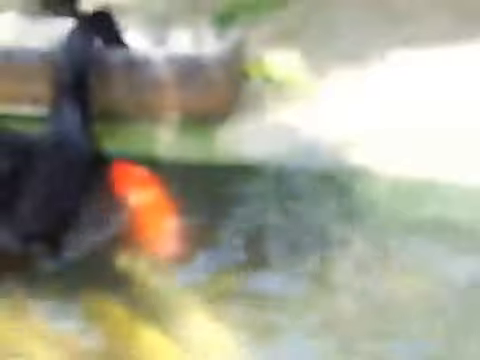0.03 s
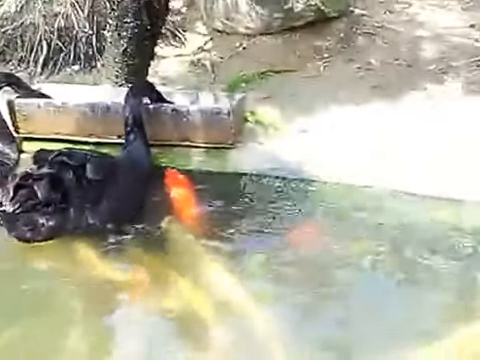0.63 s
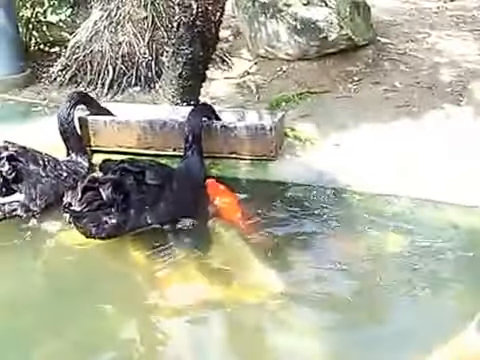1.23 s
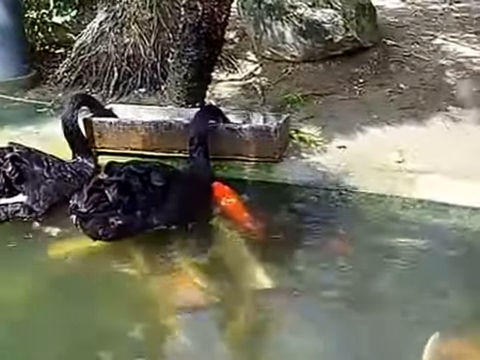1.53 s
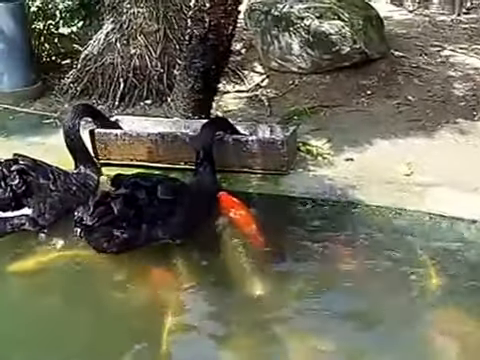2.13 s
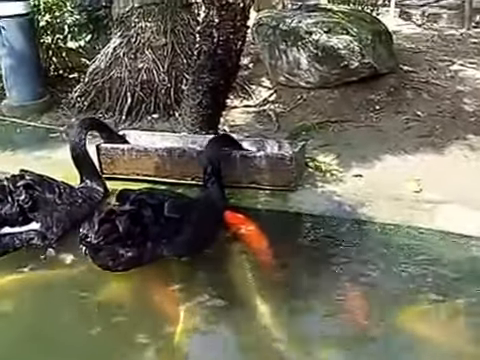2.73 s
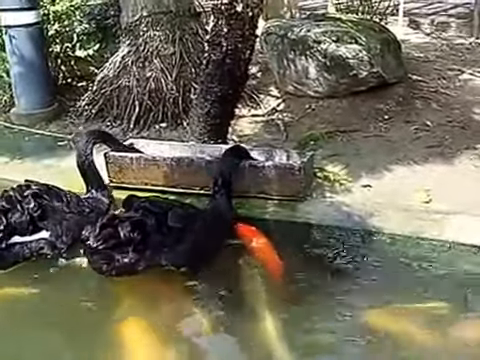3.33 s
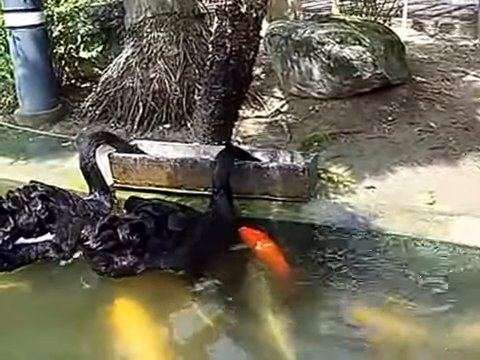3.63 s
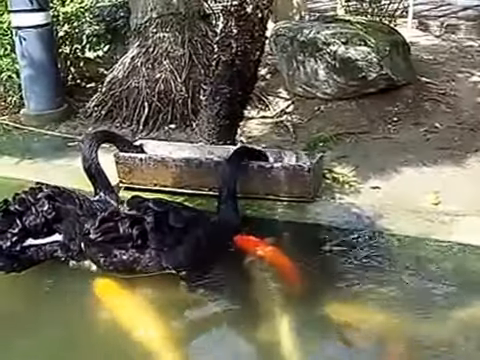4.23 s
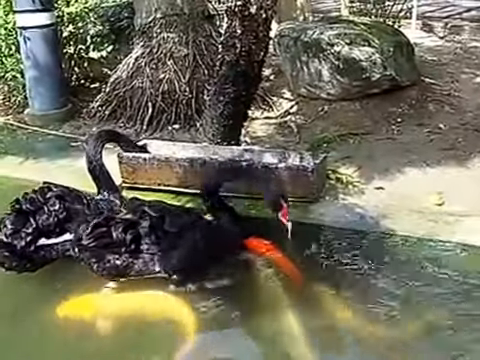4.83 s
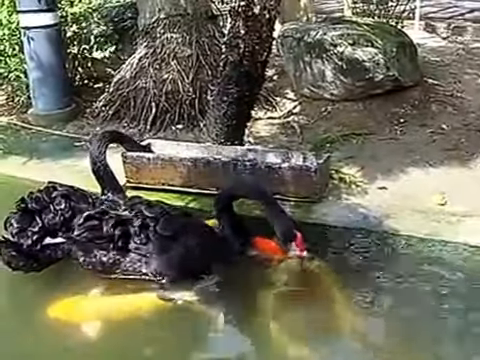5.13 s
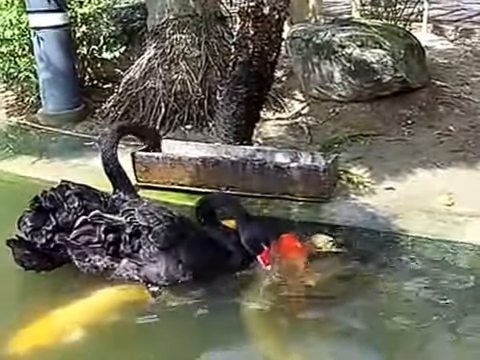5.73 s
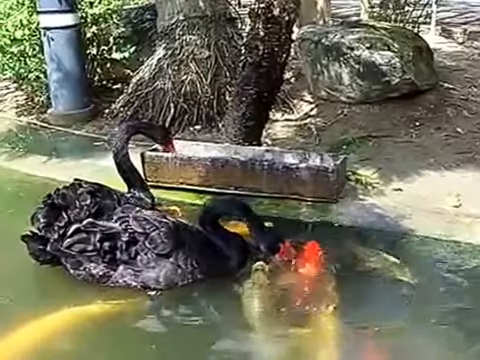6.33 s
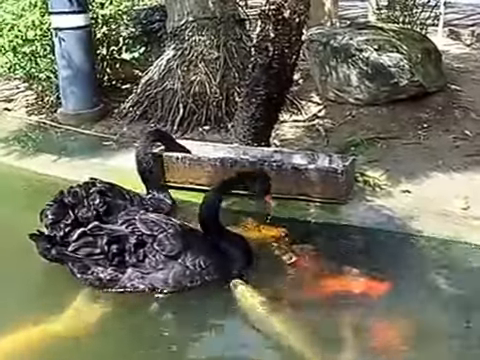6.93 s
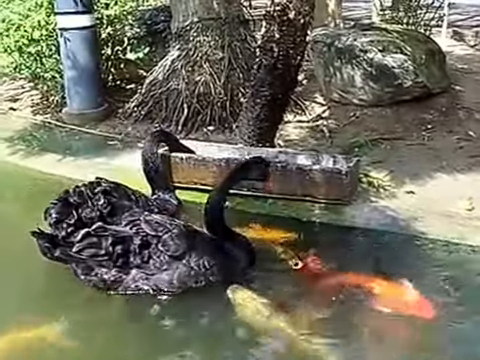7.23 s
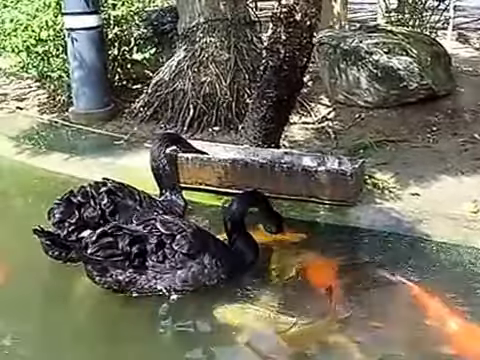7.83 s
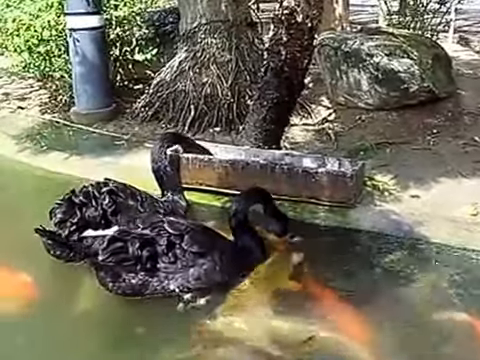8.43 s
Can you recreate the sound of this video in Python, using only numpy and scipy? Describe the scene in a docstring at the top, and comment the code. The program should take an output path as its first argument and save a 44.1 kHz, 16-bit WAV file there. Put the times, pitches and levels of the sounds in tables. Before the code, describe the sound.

Quick hollow pecks of feeding swans, with small plops, faint fish slurps and low wind gusts, after a short camera zoom buzz.

```python
"""A small camera's lens motor buzzes for a second as it zooms out, over quick runs of hollow knocks:
black swans feeding, bills striking a pond-side trough. Water ticks, plops and fizzes as bubbles ring
and burst, carp slurp at the surface, and a swan dips in with a splash. Birds call from far trees,
and gusts thump on the microphone, heaviest in the second half."""
import sys
import numpy as np
from scipy import signal
from scipy.fft import rfft, irfft
from scipy.io import wavfile
from scipy.ndimage import uniform_filter1d

SR = 44100
rng = np.random.default_rng(int(sys.argv[2]) if len(sys.argv) > 2 else 0)


def dump_mix(stems):
    """Bounce the given channels to the path in sys.argv[1] as a 16-bit WAV at rate SR."""
    frames = np.atleast_2d(stems).T  # one column per channel
    limited = np.clip(frames, -1, 1)  # hard clip at full scale
    pcm = np.round(limited * 32767).astype(np.int16)
    wavfile.write(sys.argv[1], SR, pcm)


N = 374761
T = np.arange(N) / SR


# Runs of bill strokes: first t/s, last t/s, first level/dB, last level/dB, closing tap re stroke/dB
BILL_RUNS = [(0.051, 0.365, -40.5, -31.5, -12), (0.437, 0.736, -31, -35.5, -14),
             (0.958, 0.958, -39, -39, -12), (1.107, 1.409, -38, -40, -12), (1.566, 1.642, -42, -41, -12),
             (1.8, 2.108, -37.5, -42, -11), (2.181, 2.258, -35.5, -35.5, -13),
             (2.335, 2.476, -40, -33, -11), (2.7, 2.778, -41, -44, -12), (2.85, 3.0, -32.5, -33, -8),
             (3.08, 3.24, -36, -36.5, -4), (3.319, 3.481, -38, -43, -12), (3.641, 3.88, -41.5, -43, -12),
             (4.189, 4.541, -39, -36, -14), (4.612, 4.831, -34.5, -35, -15),
             (4.981, 5.058, -34, -35.5, -15), (5.131, 5.281, -39, -33.5, -12),
             (5.359, 5.511, -36, -41, -12), (6.808, 7.175, -36.5, -35, -12), (7.474, 7.682, -35, -41, -13),
             (8.351, 8.438, -40.5, -44, -12)]
def strokes():
    """The feeding rhythm: a run keeps its pace while its force grows or fades, and ends on an accent."""
    pace_s, final_accent_db, scatter_db = 0.075, 2.5, 1.5
    for first, last, first_db, last_db, closing_db in BILL_RUNS:
        for u in np.linspace(0, 1, round((last - first) / pace_s) + 1):
            accent_db = final_accent_db * (u == 1) + scatter_db * rng.standard_normal()
            yield first + u * (last - first), first_db + u * (last_db - first_db) + accent_db, closing_db


# The trough's hollow body, one mode a row: f/Hz, t60/s, relative level/dB
TROUGH_MODES = [(252, 0.034, -19), (379, 0.045, -14), (555, 0.021, -4.5), (584, 0.018, 0.5),
                (682, 0.018, -9.5), (1195, 0.0075, 5.5), (1410, 0.007, -22), (2300, 0.0085, -5.5)]
def pecks():
    """Each stroke snaps and knocks the trough at a new place, and the bill closes softly just after."""
    hz, t60, db = np.transpose(TROUGH_MODES)[:, :, None]
    out, t = np.zeros(N), span(0.05)
    attack = 1 - np.exp(-t / 0.00029)
    for at, level_db, closing_db in strokes():
        place, size = rng.standard_normal((2, *hz.shape))
        bright_db = 0.082 * (level_db + 26) - 9  # harder strokes are brighter
        gain = amp(db + 2.5 * size + (hz > 1000) * bright_db)
        body = (gain * ring(t, hz * (1 + 0.038 * place), t60)).sum(axis=0)
        snap = band(rng.standard_normal(len(t)), 1600, 1300) * np.exp(-t / 0.0025)
        knock = body * attack + amp(bright_db) * snap
        knock *= amp(level_db + 4) / np.abs(knock).max()
        add(out, at + 0.00055, knock)
        closing_at = at + rng.uniform(0.008, 0.023)
        add(out, closing_at, amp(closing_db + 0.83 * rng.standard_normal()) * knock)
    return high_pass(out, hz=192)


# The lens barrel's ring, one mode a row: f/Hz, t60/s, relative level/dB
BARREL_MODES = [(1070, 0.13, -33.5), (1470, 0.0099, -16.5), (1980, 0.0086, -14), (2100, 0.007, -12.5),
                (2420, 0.0076, -13), (2960, 0.004, -12.5), (3400, 0.032, -35.5), (3730, 0.036, -26),
                (4950, 0.0093, -11.5), (5220, 0.013, -15), (6840, 0.0046, -12), (7270, 0.0072, 1),
                (6990, 0.003, -8)]
def zoom_motor():
    """A stepper motor clicks the lens barrel; every third step lands hard and late, the last ones slow."""
    steps, fast_steps = 133, 121
    step_s, slow_step_s, late_s = 0.007852, 0.00932, 0.0005
    softness_db = [0, 9, 14]  # cycles with the steps
    hz, t60, db = np.transpose(BARREL_MODES)[:, :, None]
    out, t, drift = np.zeros(N), span(0.03), walk(5)
    push = 1 - np.exp(-t / 0.0005)  # the rotor needs a moment to load the barrel
    treble = np.clip((hz - 2300) / 4500, 0, 1)
    for k, (force, edge, slip) in enumerate(rng.standard_normal((steps, 3))):
        slowing = max(k - fast_steps, 0) * (slow_step_s - step_s)
        at = 0.0004 + k * step_s + slowing + late_s * (k % 3 == 0)
        at += 1.2e-4 * drift[int(at * SR)] + 1.2e-5 * slip
        limp = 0.5 + 0.5 * np.sin(np.pi * k / steps)  # the steps are most uneven in mid travel
        dull_db = (limp * (softness_db[k % 3] - 9) + 9.5 + 0.5 * edge) * treble
        detune, size = rng.standard_normal((2, *hz.shape))
        modes = ring(t, hz + 9 * detune, t60) * amp(db - dull_db + 0.5 * size)
        scrape = amp(-6.5) * band(rng.standard_normal(len(t)) * np.exp(-t / 0.0034), 2090, 470)
        add(out, at, amp(0.37 * force) * push * (modes.sum(axis=0) + scrape))
    return amp(-20.5) * high_pass(out, hz=950)


def stray_droplets():
    """Cues for faint ticks of spray at random times, each with its own pitch."""
    per_s, level_db, centre_hz, body_db = 1.3, -44.5, 7200, -13
    chance = rng.random((round(per_s * N / SR), 2))
    return [(when * N / SR, level_db, centre_hz * 1.25 ** (pitch - 0.5), body_db)
            for when, pitch in chance]


# The sharpest ticks: t/s, relative level/dB, ring f/Hz, body trim/dB
SHARP_TICKS = [(1.336, -34.5, 7860, -23), (1.3907, -29.5, 7400, -2), (1.4061, -27.5, 6370, -13),
               (1.4238, -34, 7940, -8.5), (1.4406, -30.5, 6450, -15), (1.4875, -23, 7200, -13),
               (1.504, -38.5, 7020, 2), (1.5208, -35, 5200, -2), (1.6172, -35.5, 6300, -9.5),
               (1.7302, -35, 8000, -26), (2.0458, -35.5, 7940, -14), (3.0907, -38, 7850, -4),
               (3.2934, -35, 7630, -15), (3.629, -33, 7200, -14.5), (5.1992, -32, 7600, 5.5),
               (5.3199, -31.5, 7200, -4), (5.4047, -37.5, 6800, 4.5), (6.0079, -31.5, 7584, -5),
               (6.206, -34.5, 7060, -3.5), (6.246, -32.5, 7450, -19), (6.4672, -33.5, 5800, -21.5),
               (6.5545, -44.5, 5900, 12)]
def ticks():
    """Spray and bill tips make tiny dry snaps: a brief high ring and a crack with some body."""
    out, t = np.zeros(N), span(0.02)
    attack = 1 - np.exp(-t / 0.0005)
    decay = np.exp(-t / 0.0007) + 0.07 * np.exp(-t / 0.003)
    for at, db, hz, body_db in SHARP_TICKS + stray_droplets():
        crack = rng.standard_normal(len(t)) * attack * decay
        tip = amp(6) * unit(ring(t, hz, t60=0.0042)) + steep_band(crack, 6500, 3400)
        body = amp(body_db - 2.5) * steep_band(crack, 2300, 2600)
        add(out, at + 0.00089, amp(db - 12) * (unit(tip) + body))
    return out


# Bubbles and drips: t/s, relative level/dB, starting f/Hz
BUBBLES = [(1.5205, -39, 3030), (1.585, -42.5, 2400), (2.216, -37.5, 2650), (2.771, -45, 2840),
           (5.021, -36, 1395), (5.059, -40, 1520), (5.2058, -33, 2470), (5.5914, -35.5, 2780),
           (6.2087, -43, 1070), (6.309, -33.5, 2230), (6.4277, -37, 2070), (6.555, -34.5, 2590),
           (6.634, -35, 1250)]
def plops():
    """Small bubbles ring and rise in pitch as they reach the surface; each opens with a wet crack."""
    out, t = np.zeros(N), span(0.03)
    attack = 1 - np.exp(-t / 0.0011)
    for at, db, hz in BUBBLES:
        crack = band(rng.standard_normal(len(t)) * np.exp(-t / 0.0022), hz, 1100)
        bubble = unit(ring(t, hz, t60=0.02, rise=0.069)) + amp(-5) * unit(crack)
        add(out, at + 0.00055, amp(db - 11.5) * bubble * attack)
    return out


# Carp sucking at the surface: t/s, length/s, start f/Hz, end f/Hz, level/dB
CARP_GULPS = [(2.879, .08, 426, 950, -50), (5.468, 0.06, 759, 2300, -55.5),
              (5.843, 0.081, 455, 1776, -48.5), (5.932, 0.04, 813, 1930, -61),
              (6.196, 0.088, 950, 1560, -73), (6.515, 0.042, 543, 1650, -58)]
def slurps():
    """A pocket of air shrinks in a closing mouth, so its unsteady note sweeps upward."""
    out, flutter = np.zeros(N), walk(350)
    for at, length, from_hz, to_hz, db in CARP_GULPS:
        u = span(length) / length
        wobble = flutter[int(at * SR):][:len(u)]
        hz = from_hz * (to_hz / from_hz) ** u * (1 + 0.03 * wobble)
        phase = 2 * np.pi * np.cumsum(hz) / SR
        note = np.sin(phase) + amp(-10) * np.sin(1.6 * phase)
        envelope = np.sin(np.pi * u ** 0.75) ** 2 * (1 + 0.35 * wobble)
        add(out, at, amp(db) * unit(note * envelope))
    return out


# Splashes and soft laps: t/s, length/s, relative level/dB, spray trim/dB
SPLASH_CUES = [(1.156, 0.04, -56, -36), (1.37, 0.017, -55, -5), (1.508, 0.019, -53.5, -6),
               (5.045, 0.058, -56.5, -28), (5.18, 0.01, -50, 1), (5.197, .02, -39.5, -10.5),
               (5.31, 0.054, -45.5, -2), (6.06, 0.024, -54, -21), (6.111, 0.17, -52, -0.5),
               (6.404, 0.11, -57, 8), (6.804, .19, -62, -17)]
def splashes():
    """Broken water: a shower of little bubbles and finer spray."""
    out, t = np.zeros(N), span(0.015)
    for at, length, db, spray_db in SPLASH_CUES:
        shower = np.zeros(int(length * SR) + len(t))
        for when, pitch, size, kind in rng.random((70, 4)):
            is_spray = kind > 0.5
            hz = 5000 * 1.65 ** pitch if is_spray else 1050 * 3 ** pitch
            cycles = 16 if is_spray else 11
            grain = ring(t, hz, t60=cycles / hz) * (1 - np.exp(-2 * t * hz))
            grain_db = -3 * np.log(1 - size) + is_spray * (spray_db + 10)
            add(shower, length * when ** 1.2, grain * amp(grain_db))
        add(out, at, amp(db + max(spray_db, 0) / 2) * unit(shower))
    return out


# Fader ride for the ripples around the swans: t/s, relative level/dB
FIZZ_RIDE = [(0, -53), (1.3, -56.5), (4.9, -56.5), (5.3, -57), (6.5, -58), (7, -61.5), (8, -62), (8.5, -57)]
def fizz():
    """Tiny bubbles burst at random on the rippling surface."""
    out, t = np.zeros(N), span(0.015)
    for when, pitch, size in rng.random((600, 3)):
        burst = rng.standard_normal(len(t)) * t * np.exp(-t / 0.002)
        grain = band(burst, hz=1500 + 6500 * pitch ** 0.7, width_hz=890)
        add(out, when * N / SR, grain * amp(16 * size ** 2))
    return unit(out) * amp(curve(FIZZ_RIDE) - 0.5)


# Far calls: t/s, length/s, start f/Hz, end f/Hz, warble depth/share of pitch, relative level/dB
BIRD_CALLS = [(2.891, 0.042, 3040, 2850, 0.1, -54), (3.993, 0.07, 3240, 3070, 0.11, -39.5),
              (5.208, 0.0844, 3135, 2946, 0.16, -44.5), (5.62, 0.095, 3086, 3060, 0.116, -46),
              (8.03, 0.2, 3610, 3260, 0.013, -60.5), (8.035, 0.095, 4620, 4400, .012, -56),
              (8.345, 0.14, 3410, 3380, .01, -69)]
def birds():
    """Short warbled calls and thin whistles, heard mostly as echoes from the trees."""
    calls, warble = np.zeros(N), walk(500)
    for at, length, from_hz, to_hz, depth, db in BIRD_CALLS:
        u = span(length) / length
        hz = (from_hz + (to_hz - from_hz) * u) * (1 + depth * warble[int(at * SR):][:len(u)])
        whistle = np.sin(2 * np.pi * np.cumsum(hz) / SR)
        add(calls, at, amp(db) * whistle * np.sin(np.pi * u) ** 0.5)
    near = echo(calls, t60=0.18)
    far = echo(band(calls, 3120, 450), t60=0.66)
    return amp(-2) * calls + amp(0.5) * near + amp(3.5) * far


# Fader ride for the breeze: t/s, relative level/dB
BREEZE_RIDE = [(0, -49), (0.8, -50), (1.2, -49.5), (2.5, -49.5), (3.2, -46.5), (3.75, -39.5), (4.25, -42),
               (4.66, -32.5), (4.88, -45), (5.12, -34), (5.53, -37), (5.8, -33.5), (6.68, -30),
               (6.94, -39.5), (7.35, -35.5), (7.66, -36.5), (7.98, -32.5), (8.36, -37.5), (8.5, -51)]
# Gusts that thump: peak t/s, length/s, relative rumble level/dB, buffeting level/dB
GUSTS = [(0.42, 0.2, -35, -48.5), (2.72, 0.17, -34.5, -54), (4.452, 0.034, -25, -51),
         (4.579, 0.063, -25.5, -32.5), (5.343, 0.068, -29, -28), (5.656, 0.13, -24.5, -38.5),
         (6.07, 0.1, -26, -42), (6.281, 0.024, -29, -29), (6.43, 0.072, -17, -30), (6.5, 0.052, -44, -31),
         (6.578, 0.047, -28, -35.5), (6.775, 0.072, -21, -28.5), (7.054, 0.065, -28, -49),
         (7.578, 0.056, -32, -38.5), (7.757, 0.13, -27.5, -30), (7.913, 0.067, -28.5, -33.5),
         (8.012, 0.063, -24, -39.5)]
# EQ of the deep rumble: f/Hz, gain/dB
RUMBLE_EQ = [(8, -21), (20, 8), (35, -1), (60, -5), (85, -10), (130, -43), (300, -61.5)]
# EQ of the buffeting above it: f/Hz, gain/dB
BUFFET_EQ = [(45, -17), (85, -0.5), (120, -2), (170, -9), (250, -20.5), (400, -32.5), (900, -54.5)]
def wind():
    """Eddies rumble on the microphone; buffeting grows faster than the breeze; gusts swell and die."""
    lull_db, growth_db_per_db, attack_share = -57, 2.1, 0.33
    breeze_db = curve(BREEZE_RIDE) + 2 * walk(16)  # eddies keep it unsteady
    rumble = amp(breeze_db)
    buffeting = np.hypot(amp(lull_db), amp(-41 + growth_db_per_db * (breeze_db + 30)))
    for at, length, rumble_db, buffet_db in GUSTS:
        width = length * np.where(T < at, attack_share, 1 - attack_share)
        swell = np.exp(-((T - at) / width) ** 2)
        rumble = np.hypot(rumble, amp(rumble_db) * swell)
        buffeting = np.hypot(buffeting, amp(buffet_db) * swell)
    low_end = amp(2.5) * rumble * turbulence(RUMBLE_EQ, steady_s=0.065)
    return low_end + buffeting * turbulence(BUFFET_EQ, steady_s=0.044)


def turbulence(eq, steady_s):
    """Churning air: coloured noise held at an even strength."""
    x = colour(noise(), eq)
    return x / np.sqrt(uniform_filter1d(x ** 2, int(steady_s * SR)) + 1e-12)


# EQ of the distant air: f/Hz, gain/dB
AIR_EQ = [(30, -3.5), (150, 12.5), (300, 10.5), (400, 7), (490, 2.5), (620, 7), (1000, 1), (2000, -4.5),
          (2900, -5), (3600, -14.5), (5500, -1), (8000, -9.5)]
# EQ of the soft high hiss: f/Hz, gain/dB
HISS_EQ = [(300, -2.5), (1200, -3), (2300, 3), (3300, -4.5), (5500, -5.5), (6700, 0), (7700, 6), (8500, -5)]
# Fader ride for the hiss: t/s, relative level/dB
HISS_RIDE = [(1.1, -56), (3.22, -56), (3.32, -46.5), (3.85, -44.5), (4.05, -41.5), (4.31, -43.5),
             (4.42, -49.5), (4.8, -58), (5.5, -51), (6.6, -57), (7.1, -61.5), (8.5, -58)]
# Fader ride for the rustle of far trees: t/s, level/dB
LEAVES_RIDE = [(0, -79), (6.3, -67.5), (7.2, -73), (7.7, -62), (8.1, -66), (8.5, -67.5)]
def park():
    """The bed: distant air with a faint hum in it, a high hiss that swells for a while, and leaves."""
    air = unit(colour(noise(), AIR_EQ)) * amp(-55 + walk(6))
    hum = steep_band(noise(), 485, 37) * amp(-67.5 + 2 * walk(2.2))
    hiss = unit(colour(noise(), HISS_EQ)) * amp(curve(HISS_RIDE) - 4)
    leaves = steep_band(noise(), 2810, 700) * amp(curve(LEAVES_RIDE) + 2 * walk(9))
    return air + hum + hiss + leaves


def amp(db):
    """Decibels to gain."""
    return 10 ** (np.asarray(db) / 20)


def unit(x):
    """Scale to rms 1."""
    return x / np.sqrt(np.mean(x ** 2))


def curve(rows):
    """A fader ride: (time, value) points joined by straight lines."""
    return np.interp(T, *np.transpose(rows))


def span(seconds):
    """Time axis of a short sound."""
    return np.arange(int(seconds * SR)) / SR


def add(out, at, x):
    """Mix x into out from time at."""
    i = int(np.clip(at * SR, 0, N - 1))
    out[i:i + len(x)] += x[:N - i]


def colour(x, points):
    """Minimum-phase EQ through the given (f/Hz, gain/dB) points."""
    size = 16384
    hz, db = np.transpose(points)
    f = np.maximum(np.fft.rfftfreq(size, 1 / SR), 1)
    gain = amp(np.interp(np.log(f), np.log(hz), db))
    cepstrum = irfft(np.log(gain))
    cepstrum[1:size // 2] *= 2  # folding the cepstrum makes the filter causal
    cepstrum[size // 2 + 1:] = 0
    impulse = irfft(np.exp(rfft(cepstrum)))[:size // 2]
    return signal.fftconvolve(x, impulse)[:len(x)]


def band(x, hz, width_hz):
    """One resonance."""
    return signal.lfilter(*signal.iirpeak(hz, hz / width_hz, fs=SR), x)


def steep_band(x, hz, width_hz):
    """The same resonance twice over, scaled to rms 1."""
    return unit(band(band(x, hz, width_hz), hz, width_hz))


def high_pass(x, hz):
    """Steep low cut."""
    return signal.sosfilt(signal.butter(4, hz, "high", fs=SR, output="sos"), x)


def noise():
    """White noise as long as the scene."""
    return rng.standard_normal(N)


def walk(per_s):
    """Smooth random wander with spread 1."""
    hold = int(SR / per_s)
    stairs = np.repeat(noise()[:N // hold + 1], hold)
    return unit(uniform_filter1d(uniform_filter1d(stairs, hold), hold)[:N])


def ring(t, hz, t60, rise=0):
    """A damped oscillation whose pitch may rise as it dies."""
    return np.sin(2 * np.pi * hz * t * (1 + rise * t / t60 / 2)) * np.exp(-np.log(1000) * t / t60)


def echo(x, t60):
    """Diffuse outdoor reflections with about the same energy as x."""
    t = span(1)
    tail = rng.standard_normal(len(t)) * np.exp(-np.log(1000) * t / t60)
    return signal.fftconvolve(x, tail / np.sqrt(np.sum(tail ** 2)))[:N]


def scene():
    """The mono mix: everything at the pond, with a little echo from the bank."""
    pond = pecks() + plops() + slurps() + splashes() + fizz()
    snaps = ticks()
    bank = amp(-8) * echo(pond + amp(-15) * snaps, t60=0.23)
    return (pond + snaps + bank + zoom_motor() + birds() + wind() + park())[None]


# The microphone's colour: f/Hz, gain/dB
MIC_EQ = [(20, -1.5), (3200, 0.5), (3700, -7), (4200, -16), (4700, -9), (5200, -5), (7900, 2),
          (8300, -11.5), (8650, -42.5), (9200, -36)]
def record(dry):
    """The small microphone has a deep dip in the presence range and no top octave."""
    high_cut = signal.ellip(8, 0.2, 70, 9200, fs=SR, output="sos")
    return signal.sosfilt(high_cut, colour(dry[0], MIC_EQ))[None]


dry = scene()
out = record(dry)
dump_mix(out)
```